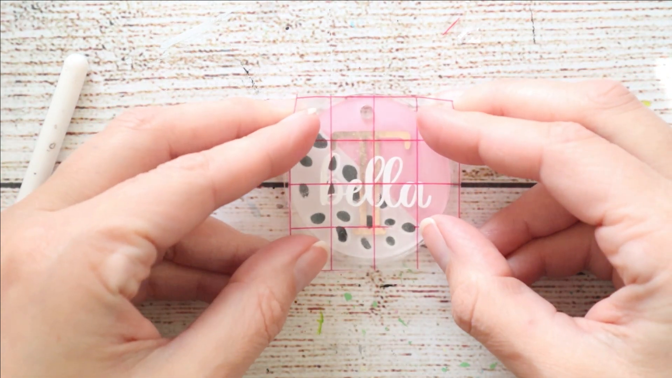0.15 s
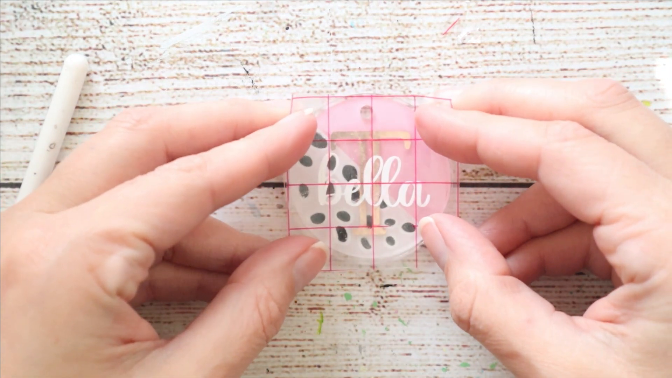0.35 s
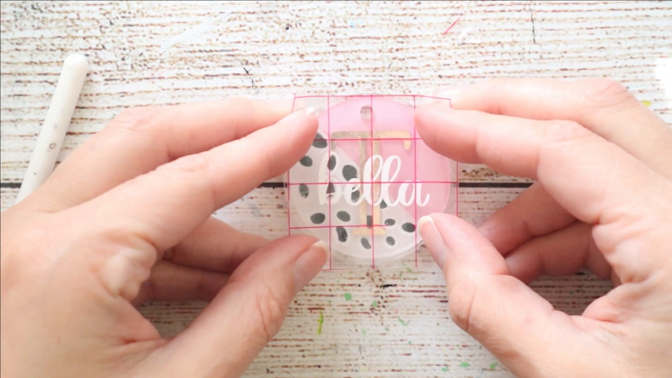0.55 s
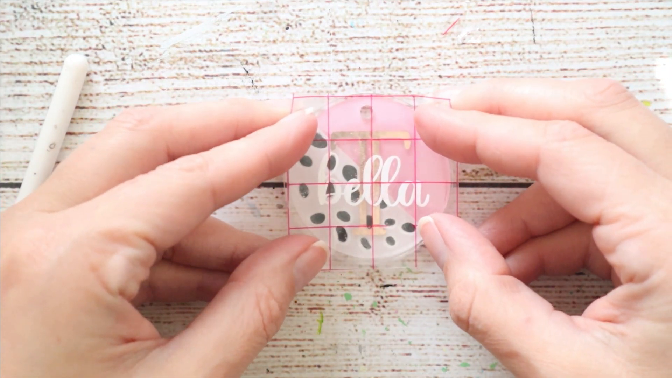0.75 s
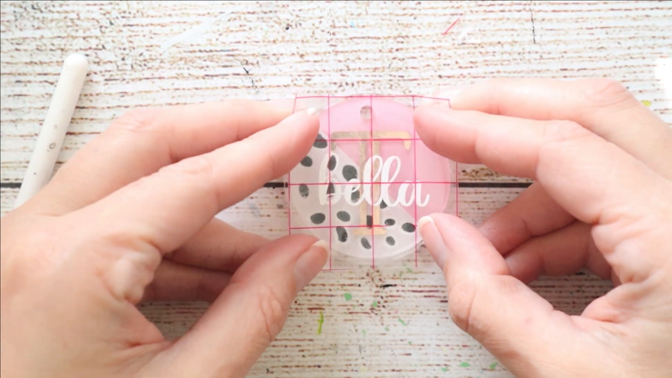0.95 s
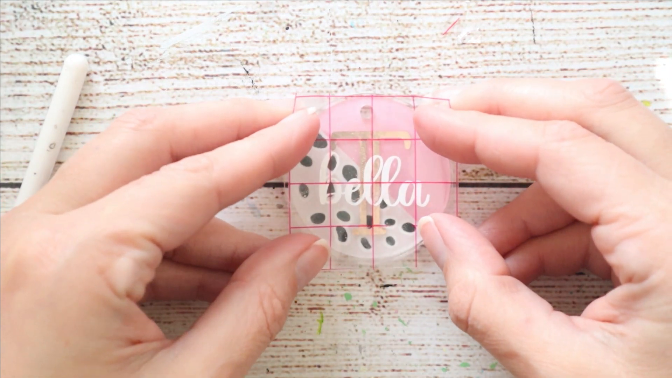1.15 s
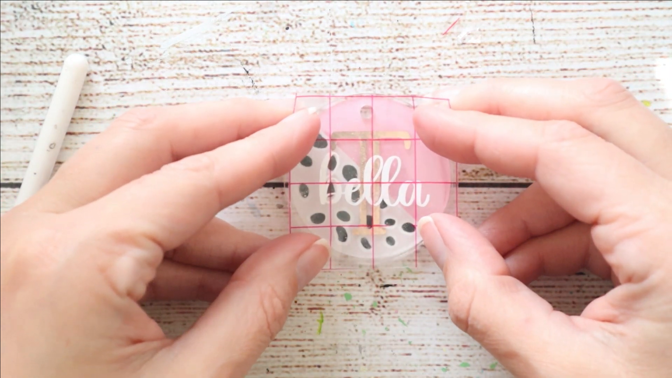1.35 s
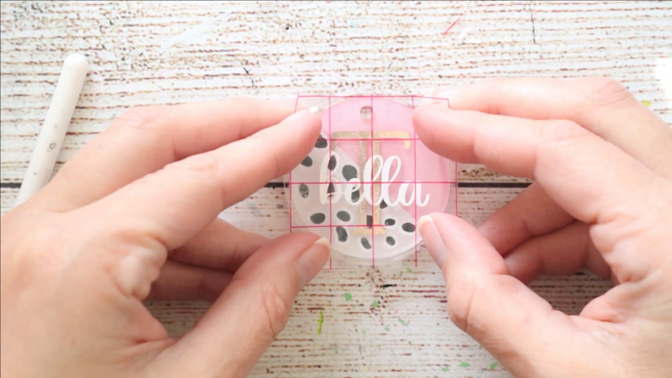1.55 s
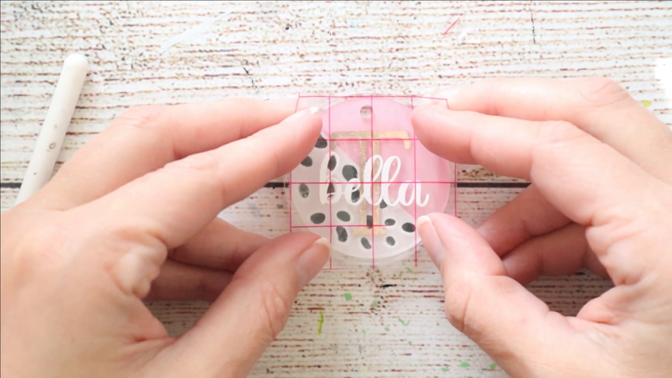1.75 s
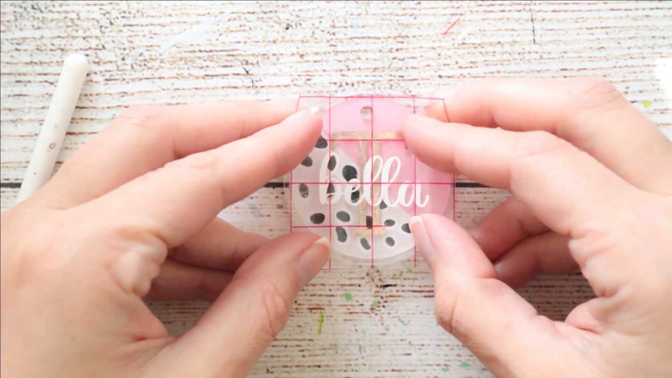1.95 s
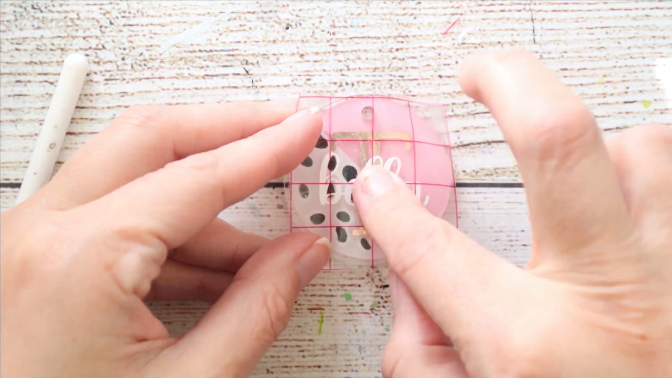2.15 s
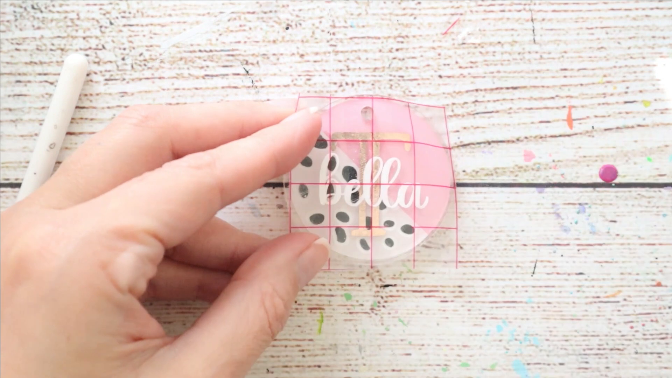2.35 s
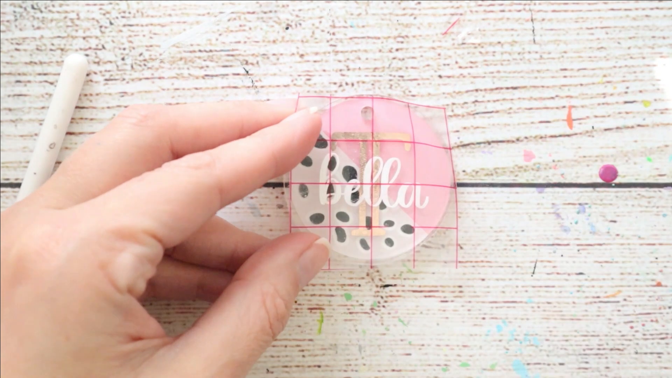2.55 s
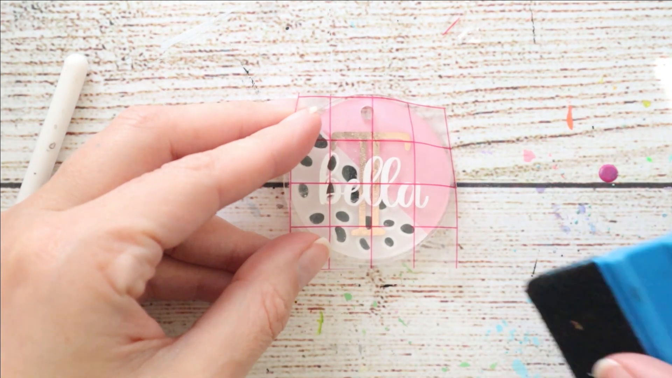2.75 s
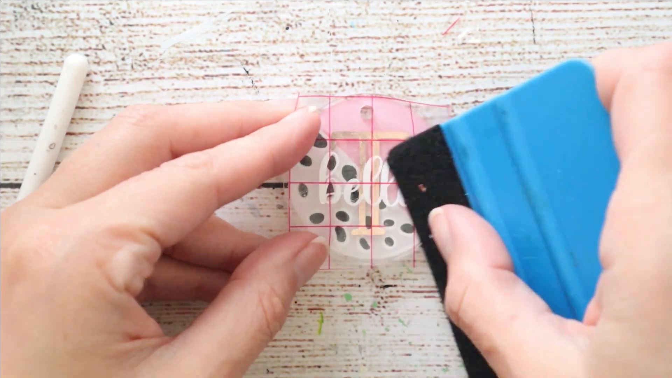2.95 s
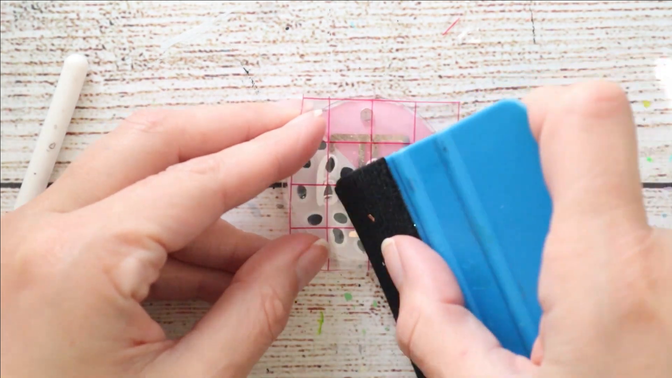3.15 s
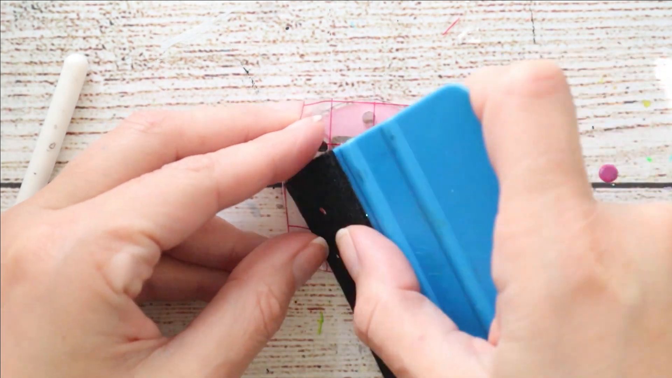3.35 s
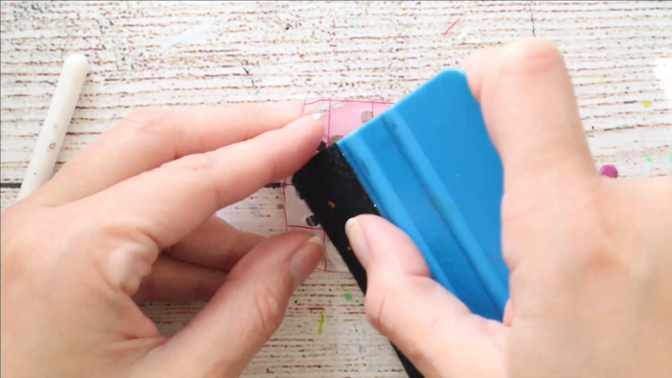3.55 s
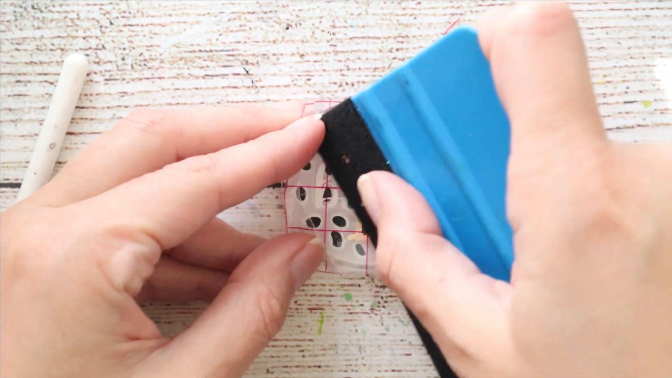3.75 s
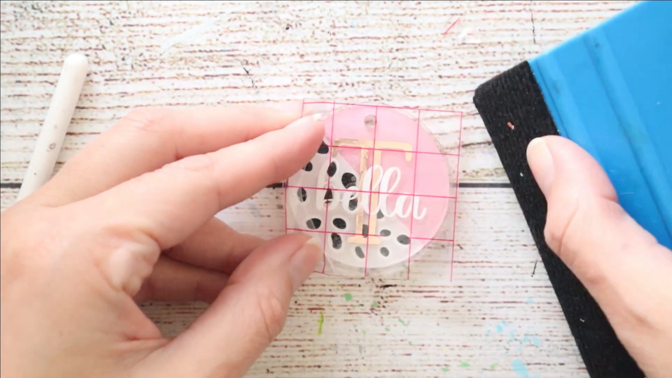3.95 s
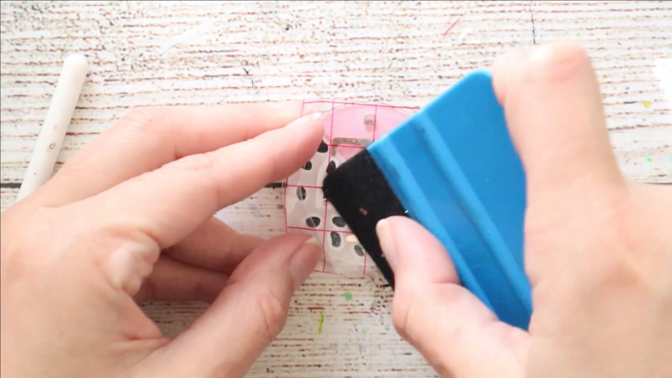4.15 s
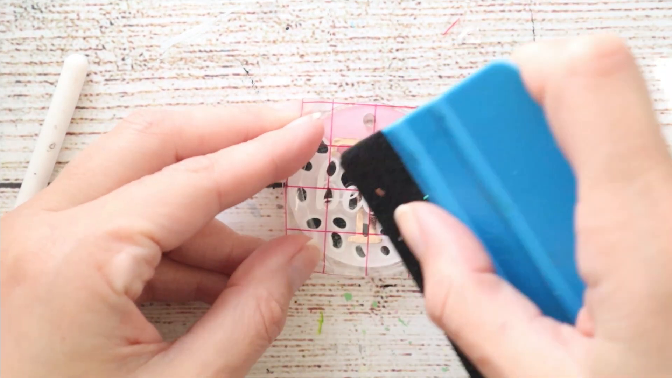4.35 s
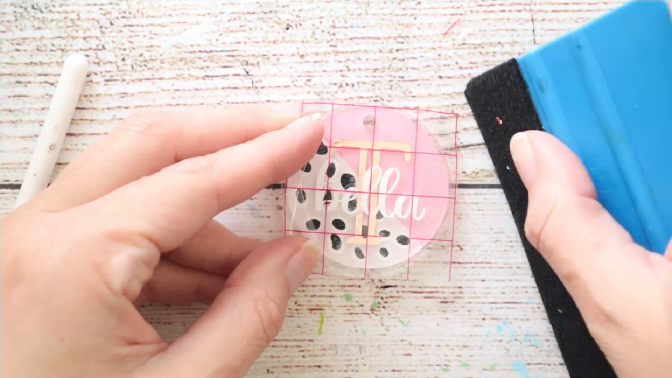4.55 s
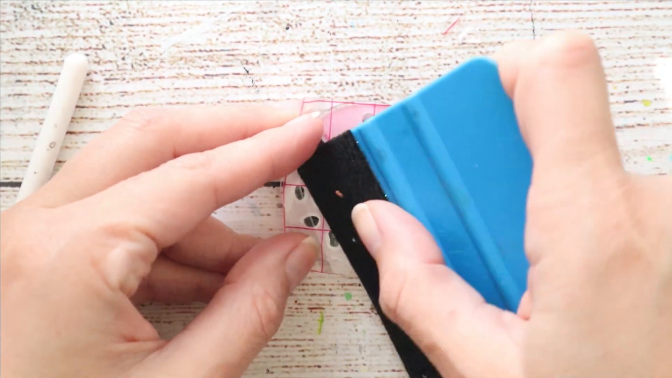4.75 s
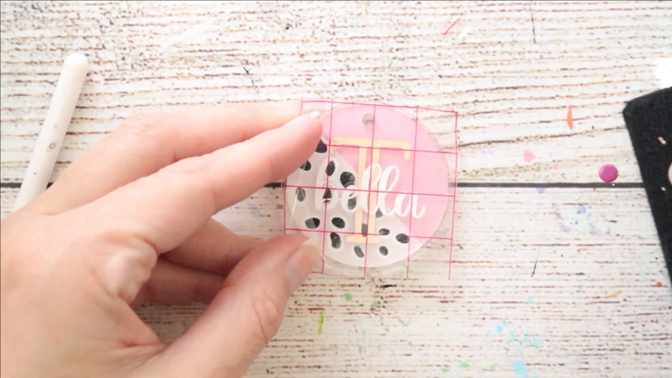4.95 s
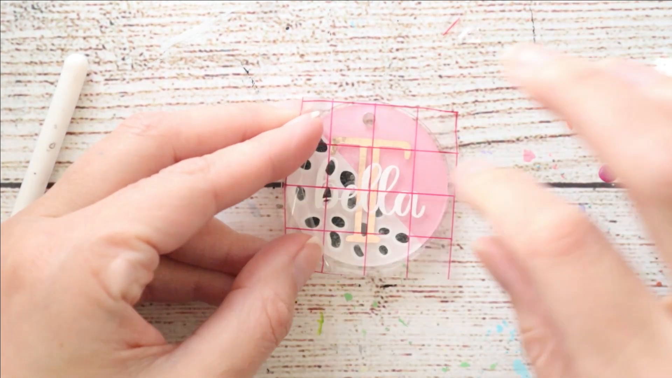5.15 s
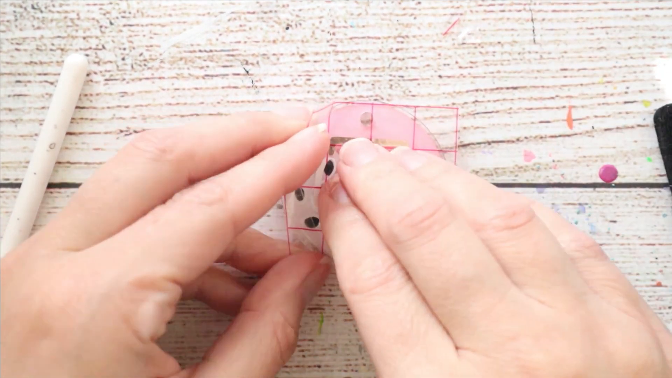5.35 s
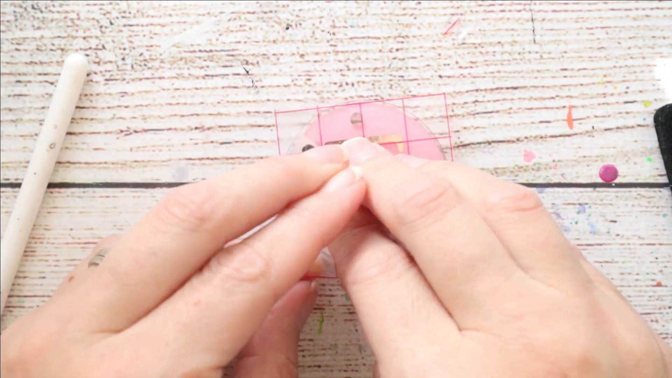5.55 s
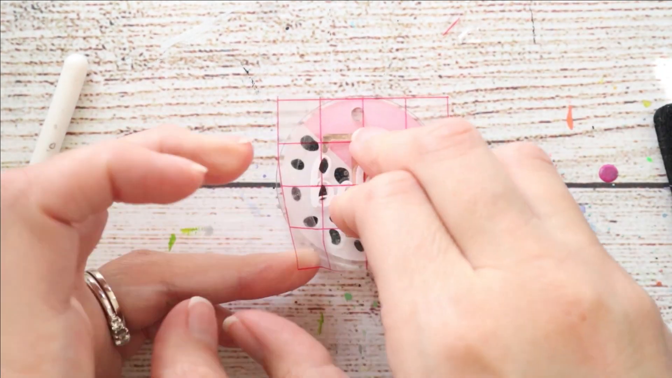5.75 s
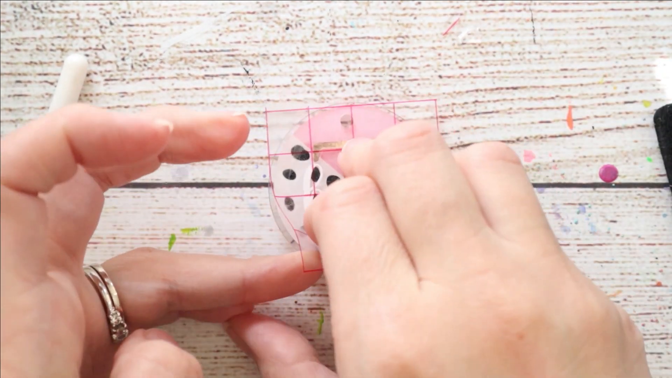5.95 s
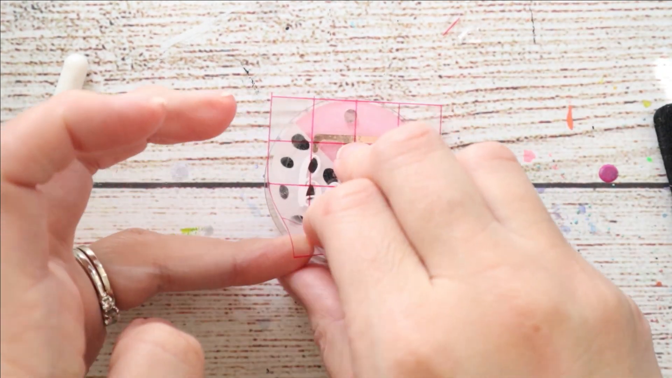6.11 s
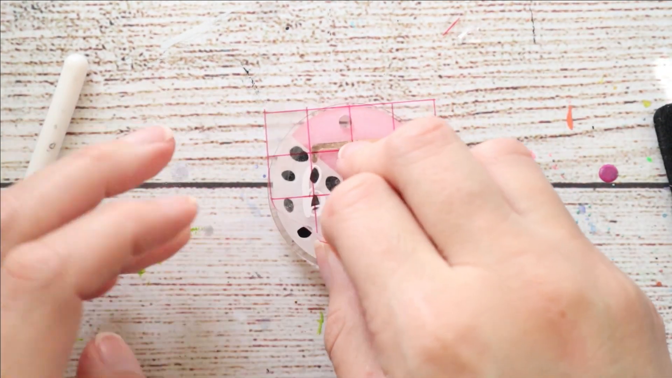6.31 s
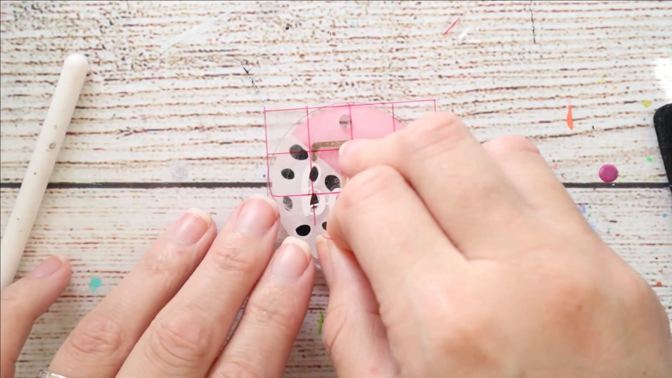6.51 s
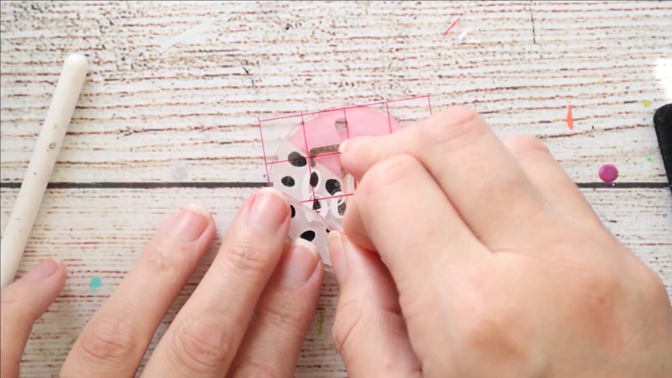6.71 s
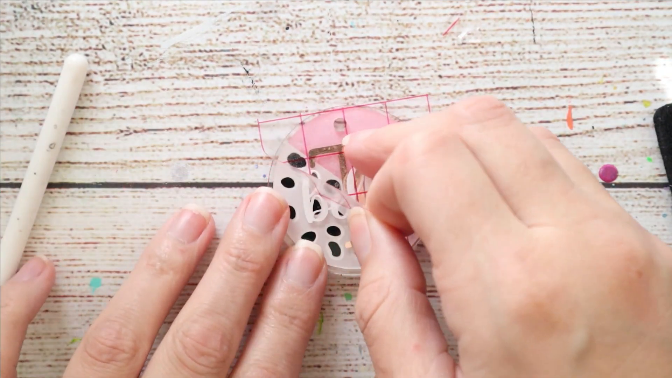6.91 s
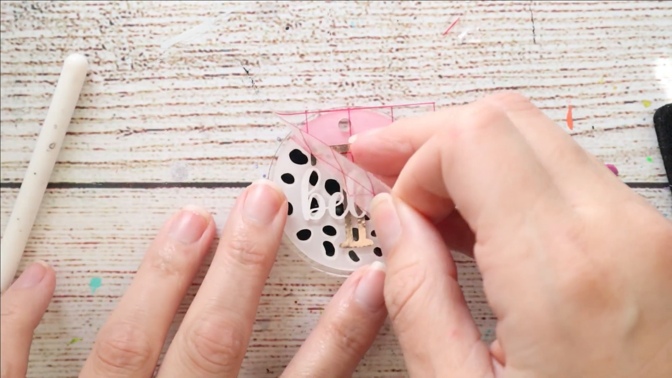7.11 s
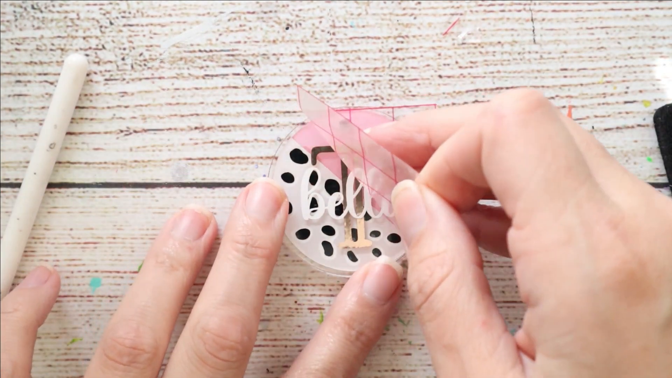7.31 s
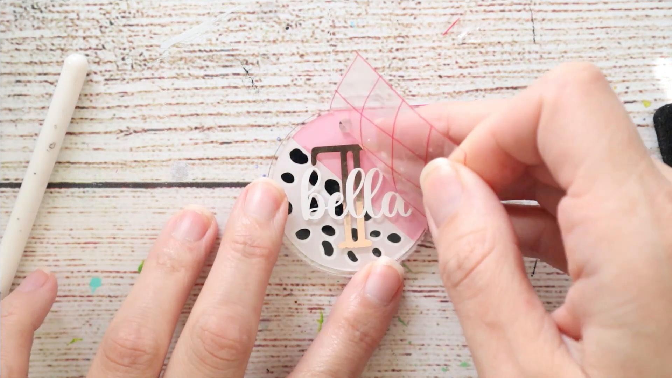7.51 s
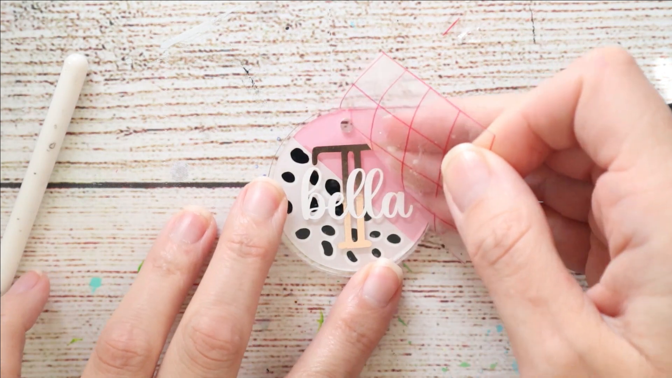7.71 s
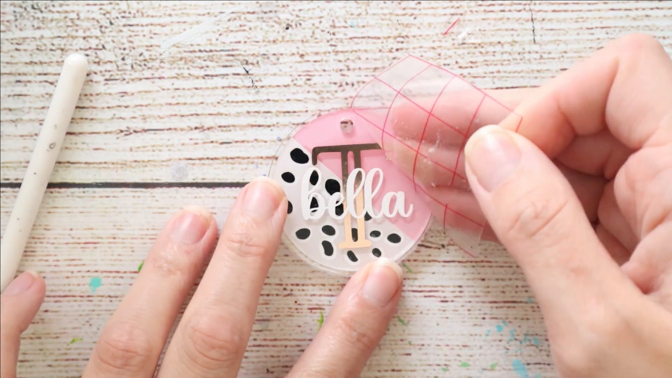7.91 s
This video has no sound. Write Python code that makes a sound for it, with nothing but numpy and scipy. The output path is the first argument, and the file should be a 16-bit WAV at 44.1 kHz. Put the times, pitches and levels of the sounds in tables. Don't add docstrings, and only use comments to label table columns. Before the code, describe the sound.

Close tabletop craft sounds: sharp film snaps, gritty rubbing, hard plastic clacks and wooden thumps, then quiet handling and soft adhesive fizz.

```python
import sys
import numpy as np
from scipy import signal
from scipy.fft import rfft, irfft, next_fast_len
from scipy.io import wavfile
from scipy.ndimage import uniform_filter1d

SR = 44100
rng = np.random.default_rng(int(sys.argv[2]) if len(sys.argv) > 2 else 0)


def how_loud(loudness_db):
    steps = np.asarray(loudness_db, float) / 20
    return 10 ** steps


def log_audio(samples):
    frames = np.atleast_2d(samples).T
    limited = np.clip(frames, -1, 1)
    pcm = np.round(limited * 32767).astype(np.int16)
    wavfile.write(sys.argv[1], SR, pcm)


N = 351473

# pitch_hz, level_db, t60_s (time to fade by 60 dB)
TABLE = [(62.45, -5.5, 0.17), (114, -5, 0.1), (140, -1.5, 0.12), (249, 3.5, 0.071), (313, 6.5, 0.041)]
# pitch_hz, level_db, t60_s
PLASTIC = [(591, -9, 0.073), (696, -0.5, 0.017), (1046, -1, 0.011), (1140, -14.5, 0.0099),
           (1900, 11, 0.007), (1885, -7, 0.024), (2600, 2, 0.0088), (3100, -38, 0.035)]
# time_s, level_db
PULL = [(6.45, -71.5), (6.68, -69), (6.73, -59), (6.95, -57.5), (7.28, -60), (7.36, -58), (7.58, -55.5),
        (7.72, -63.5), (7.97, -61.5)]


def evened(x):
    return x / np.sqrt(np.mean(x ** 2) + 1e-20)


def peaked(x):
    return x / (abs(x).max() + 1e-12)


def read(points, hz):
    f, value = np.transpose(points)
    return np.interp(np.log(hz + 1), np.log(f + 1), value)


def colour(x, points):
    size = next_fast_len(x.shape[-1])
    gain = how_loud(read(points, np.fft.rfftfreq(size, 1 / SR)))
    return irfft(rfft(x, size) * gain, size)[..., :x.shape[-1]]


def band(x, lo_hz, hi_hz, order=3):
    sos = signal.butter(order, [lo_hz, min(hi_hz, 20000)], "bandpass", fs=SR, output="sos")
    return signal.sosfilt(sos, x)


def add(mix, s, sound):
    part = mix[..., round(s * SR):][..., :sound.shape[-1]]
    part += sound[..., :part.shape[-1]]


def listed(kinds):
    return sorted((*row, *traits) for rows, *traits in kinds for row in rows)


def ring(modes, t, spread_db, chance):
    total = 0
    for (hz, db, t60), (a, b) in zip(modes, chance):
        fade = how_loud(db + spread_db * a - 60 * t / t60)
        total = total + fade * np.sin(2 * np.pi * hz * (1 + 0.055 * b) * t)
    return total


def grains(size_db, per_s):
    size = how_loud(size_db * np.minimum(rng.exponential(1, N), 5))
    slips = size * (rng.random(N) < per_s / SR)
    return evened(slips * rng.standard_normal(N)) + 1.14 * rng.standard_normal(N)


def flutter(depth_db, smooth_s):
    width = round(smooth_s * SR)
    slow = uniform_filter1d(uniform_filter1d(rng.standard_normal(N), width), width)
    return evened(how_loud(depth_db * evened(slow)))


def patchy(x, depth_db):
    z = signal.stft(x, nperseg=256)[2]
    field = uniform_filter1d(rng.standard_normal(z.shape), size=5, axis=0)
    field = uniform_filter1d(field, size=40, axis=1)
    return evened(signal.istft(z * how_loud(depth_db * evened(field)), nperseg=256)[1][:N])


def hum():
    # pitch_hz, level_db
    hum_colour = [(13, -46), (22, -19), (48, -4.5), (75, -3), (273, -5), (329, -8.5), (419, -9.5),
                  (756, -14), (819, -13.5), (2270, -21.5), (3210, -25.5), (12300, -42), (13000, -44),
                  (13600, -73)]
    # pitch_hz, side_minus_mid_db
    hum_side = [(60, -39), (110, -3.5), (200, -3), (360, 3), (650, 4.5), (1180, 5), (2150, 5), (3900, 7),
                (7070, 6), (12800, 5.5)]
    mid, side = colour(rng.standard_normal((2, N)), hum_colour)
    level = how_loud(-53.5) / np.std(mid) * flutter(0.1, 0.055)
    side = colour(side, hum_side)
    return level * np.array([mid + side, mid - side])


def held(curve, mix_db, t):
    s, db = np.transpose(curve)
    level = np.interp(t, s, db, left=-120, right=-120)
    return how_loud(2 * (level + np.array(mix_db)[:, None]))


def pressure():
    # time_s, level_db
    fingers = [
        [(1.95, -81), (2.058, -61), (2.22, -52.5)],
        [(2.64, -53), (2.794, -56), (3.044, -77), (3.252, -55), (3.796, -55.5), (4.19, -72)],
        [(5.39, -72), (5.45, -58), (5.562, -90), (5.798, -63.5), (6.1, -77.5)],
    ]
    # hiss_db, scrape_db, drag_db
    finger_mix = [0, 1.1, 5.8]
    # hiss_db, scrape_db, drag_db
    pull_mix = [-4.5, -8, 0]
    # start_s, hold_s, effort_db, film_share_db
    strokes = [(2.57, 0.045, -44, -4), (3.02, 0.058, -56, -4), (3.17, 0.046, -60.5, 9),
               (3.38, 0.07, -49.5, 0), (3.86, 0.162, -59, 3), (4.24, 0.1, -41, -7),
               (4.53, 0.13, -44.5, -7.5), (4.85, 0.089, -43.5, -6)]
    # start_s, hold_s, effort_db, film_share_db
    skids = [(2.25, 0.042, -49.5, -0.5), (2.375, 0.013, -49, -2.5), (2.78, 0.0066, -53.5, -26),
             (4.35, 0.0065, -47, -16), (4.65, 0.0056, -48, -22), (4.97, 0.0045, -40.5, -1.5),
             (5.23, 0.042, -40.5, -17), (5.365, 0.0069, -47, -13), (5.46, 0.069, -66.5, 13.5),
             (6.115, 0.0084, -48, -1), (6.33, 0.082, -58.5, 8)]
    # start_s, hold_s, effort_db, film_share_db
    drags = [(2.55, 0.0033, -46, -5.5), (2.66, .03, -50, -39), (3.15, 0.076, -42, -11.5),
             (3.6, 0.08, -47.5, -27), (4.03, 0.014, -41.5, -24), (5.3, 0.055, -32, -37),
             (6.03, 0.041, -49.5, -16), (6.13, 0.054, -44, -33.5), (7.12, 0.041, -52, -34),
             (7.92, 0.039, -44.5, -26)]
    # rows, rise_db_per_s, fall_db_per_s, scrape_db, drag_db, hiss_lag_s
    motions = [(strokes, 3400, 160, 0, -1.8, 0.019),
               (skids, 1100, 121, 0, 6.6, 0.0027),
               (drags, 127, 240, -38, 0, 0.00304)]
    t = np.arange(0, N / SR + .01, .001)
    power = held(PULL, pull_mix, t) + sum(held(c, finger_mix, t) for c in fingers)
    for rows, rise, fall, scrape_db, drag_db, lag in motions:
        for s, hold, db, film_db in rows:
            start = s + np.array([[lag], [0], [0]])
            shape = db - rise * np.maximum(start - t, 0) - fall * np.maximum(t - s - hold, 0)
            power = power + how_loud(2 * (shape + np.array([[film_db], [scrape_db], [drag_db]])))
    return (np.interp(np.arange(N) / SR, t, 10 * np.log10(p)) for p in power)


def rubbing():
    # pitch_hz, level_db
    hiss_colour = [(1500, -11), (2500, 1), (3300, 1), (4300, 1.5), (5600, -0.5), (6700, -2), (7800, -4.5),
                   (9200, -5.5), (11000, 0), (13300, -11.5), (15500, -35.5), (17000, -57)]
    # pitch_hz, level_db
    scrape_colour = [(300, -27.5), (520, 5), (750, 0), (1100, -1.5), (1600, 2.5), (2100, -1), (2800, -12),
                     (3400, -11), (5000, -32), (9000, -55.5)]
    patch_db = 2.1
    hiss_db, scrape_db, drag_db = pressure()
    hiss = patchy(colour(grains(3., 3000), hiss_colour), patch_db) * flutter(1.2, .008)
    scrape = patchy(colour(grains(0.87, 2500), scrape_colour), patch_db) * flutter(0.36, 0.0052)
    t = np.arange(8000) / SR
    bumps, still = grains(4.6, 300), np.zeros((4, 2))
    low = evened(signal.oaconvolve(bumps, ring(TABLE[:3], t, 0, still))[:N])
    high = evened(signal.oaconvolve(bumps, ring(TABLE[3:] + PLASTIC[:2], t, 0, still))[:N])
    drag = high + low * how_loud(-6.0 - 0.79 * np.maximum(drag_db + 46.0, 0))
    drag = evened(drag) * flutter(2.6, .02)
    return how_loud(hiss_db) * hiss + how_loud(scrape_db) * scrape + how_loud(drag_db) * drag


def snap(db, bright_db, body_db, t60, body_hz, chance):
    t = np.arange(chance.shape[1]) / SR
    fade = how_loud(-60 * t / np.clip(t60, .004, .08)) + 4.8 * np.exp(-t / 0.00069)
    rise = 0.00025 + 0.19 * max(t60 - .026, 0)
    cracks = chance[0] * how_loud(5.64 * chance[1]) * fade * np.minimum(t / rise, 1)
    sound = peaked(band(cracks, 3300, 8680)) + how_loud(bright_db) * peaked(band(cracks, 7340, 13000))
    body = band(cracks, body_hz / 1.35, body_hz * 1.347, order=2)
    return how_loud(db) * (sound + how_loud(body_db) * peaked(body))


def film_snaps(work):
    # time_s, peak_db, brightness_db, flap_boom_db
    laying = [(2.002, -40, 1, -4), (2.062, -35.5, 0.5, -27), (2.1202, -20, 5, -13.5),
              (2.155, -31.5, 3, -22), (2.163, -26, 5.5, -25), (2.1765, -20, -1, -14), (2.18, -15, 0.5, -11),
              (2.185, -18, 1, -17), (2.2149, -19.5, 0, -17), (2.378, -33.5, -12, -1),
              (2.4394, -46, -6.5, 13), (2.5017, -32.5, -8, -12), (2.517, -35.5, -12, -4),
              (2.574, -30.5, 1, -14), (2.5958, -22.5, -26, -18), (2.952, -48.5, -10, 15),
              (2.9665, -48, -7.5, 7)]
    smoothing = [(3.1812, -19.5, -9.5, -5), (3.2725, -25.5, -8.5, -7), (3.3714, -23.5, -5, -2.5),
                 (3.3848, -25.5, -2.5, -21), (3.4274, -35.5, 2.5, 1), (3.4468, -30, -4, -6),
                 (3.6605, -36.5, -4, 5), (3.739, -30, -5.5, -6.5), (3.8373, -31, -10, -5),
                 (3.8622, -33, -2, 6.5), (3.8674, -21, -17, -41), (3.9988, -33, -3.5, 2.5),
                 (4.0284, -21, -22, -8.5), (4.041, -35.5, 9.5, -22)]
    burnishing = [(4.2176, -15.5, -10.5, -9), (4.3297, -17, 6.5, -2.5), (4.5106, 0.5, 4, -5.5),
                  (4.6325, -21, 2, 8), (4.8278, -8.5, -1.5, -7.5), (4.8325, -13, 5, -13.5),
                  (4.9474, -13, 1.5, -3), (5.2789, -37, -12, 4), (5.3615, -23.5, -29, -14),
                  (5.3692, -21, -12, -9)]
    blade = [(5.2075, -7, -28, 6), (5.2112, -20.5, -21, -22), (5.226, -19, 3, -21),
             (5.2665, -38.5, -13.5, 17.5), (5.3228, -46, -12.5, 17.5), (5.738, -55, -10, 11)]
    peeling = [(5.4487, -20.5, 3, -12.5), (5.5545, -32, -4, -4), (5.5608, -39, -6, 2),
               (5.5997, -28.5, -0.5, -36), (6.8069, -29.5, 4.5, -13), (6.8485, -51, -3, 10)]
    rustles = [(2.6044, -31.5, -1, 1), (2.7585, -44.5, 5, 10.5), (2.785, -32, -3, 6),
               (3.037, -37.5, -3.5, -16), (5.509, -21, -15.5, -5.5), (6.112, -34, -3, -8),
               (6.25, -39.5, -11.5, -6.5), (7.514, -32.5, -6, -12)]
    cracks = [(2.233, -3.5, 1.5, -21), (3.1052, -23.5, -2, 2), (3.2833, -18.5, 4.5, -16),
              (3.421, -23, -4, 2), (3.9381, -22, 8, -23), (6.3129, -26, 14, -25)]
    last_spots = [(7.7164, -54, -13, 6), (7.7368, -51, -11.5, 4), (7.7947, -44, -15, 3),
                  (7.8382, -49, -10, 4), (7.8768, -44.5, -6, 5.5), (7.9043, -48.5, -16, 7)]
    corner = [(7.918, -55, -11, 13), (7.9317, -59, -11, 16)]
    # snaps, t60_s, pitch_hz
    stages = [(laying, 0.026, 1660), (smoothing, 0.025, 2400), (burnishing, 0.028, 1710),
              (blade, 0.0071, 2500), (peeling, 0.028, 1900), (rustles, 0.05, 2400),
              (cracks, 0.026, 3560), (last_spots, .026, 5600), (corner, 0.035, 4100)]
    snaps = listed(stages)
    for (s, *row), chance in zip(snaps, rng.standard_normal((len(snaps), 2, 2000))):
        add(work, s, snap(*row, chance))


def blow(db, clack_db, hz, t60, top_hz, focus_db, skid_db, chance):
    t = np.arange(chance.shape[1]) / SR
    near = [(f, d - focus_db * abs(np.log2(f / hz)), r * t60 / 0.077) for f, d, r in TABLE]
    table = ring([(hz, 0., t60)] + near, t, 4.3, chance[1, :12].reshape(-1, 2))
    plastic = ring(PLASTIC, t[:2000], 1.95, chance[1, 20:36].reshape(-1, 2))
    push = np.exp(-t[:400] / 0.00064) * (0.14 + abs(chance[0, :400]))
    thud = signal.fftconvolve(table, push)[:len(t)]
    fade = np.exp(-t / 0.0071) + how_loud(skid_db - 60 * t / 0.16)
    rattle = chance[0] * how_loud(3.3 * chance[2]) * fade
    clack = peaked(signal.fftconvolve(rattle, plastic)[:len(t)])
    clack = clack + 0.15 * peaked(band(rattle, 520, 1600))
    clack = band(clack, 397, 1.43 * top_hz, order=2)
    return how_loud(db) * (peaked(thud) + how_loud(clack_db) * peaked(clack))


def table_blows(work):
    # time_s, peak_db, plastic_clack_db, table_pitch_hz
    hard = [(2.376, -44, 11, 260), (2.5012, -25.5, -2, 330), (3.179, -30.5, -6, 130),
            (3.42, -32.5, -20, 144), (3.535, -32.5, -28, 255), (3.836, -25, -29, 117),
            (3.868, -27.5, -16.5, 89), (5.737, -24.5, -6, 304)]
    slaps = [(2.2335, -22.5, -3.5, 303), (4.509, -10, -7, 287.4), (5.2075, -12, -1.5, 310)]
    landings = [(4.218, -10, 1, 306), (4.827, -12, -2, 292)]
    felt = [(2.518, -13.5, -10, 338), (2.594, -26.5, -1.5, 319), (3.003, -15, -15.5, 249),
            (3.999, -31, 0, 104.4), (4.948, -13, -1.5, 217), (5.321, -27, 0, 323)]
    soft = [(2.1265, -25, -6.5, 310), (2.273, -32.5, -1.5, 294), (2.82, -35, -9, 110),
            (3.2791, -32.5, -9.5, 134), (3.623, -28.5, -11, 306), (3.732, -27.5, -34, 106),
            (4.029, -17.5, -14.5, 254), (4.3288, -12, -1.5, 121), (4.632, -12.5, -9, 237),
            (5.108, -30, -5.5, 329), (5.278, -15, -4.5, 298), (5.368, -22, -5.5, 301),
            (6.04, -30.5, -18.5, 62.2), (6.3128, -22.5, -14, 104)]
    heel = [(6.101, -38, -14, 274), (6.114, -22, -9, 271), (6.13, -51, -2, 320), (6.153, -48, -10, 340),
            (6.18, -32, -6, 292)]
    # blows, t60_s, top_hz, pitch_focus_db_per_octave, skid_db
    contacts = [(hard, 0.17, 1600, 3., -2.5), (slaps, 0.1, 800, 3.3, -25.5),
                (landings, 0.16, 1340, 3.9, -8), (felt, 0.099, 1110, 3.1, -25),
                (soft, 0.14, 710, 1.4, -9.5), (heel, 0.31, 340, 30, -15)]
    blows = listed(contacts)
    for (s, *row), chance in zip(blows, rng.standard_normal((len(blows), 3, 9000))):
        add(work, s, blow(*row, chance))


def strike(modes, damping_hz, contact_s):
    t = np.arange(6000) / SR
    rung = 0
    for hz, width_hz, db in modes:
        w = width_hz + damping_hz
        rung = rung + how_loud(db) * w * np.exp(-np.pi * w * t) * np.sin(2 * np.pi * hz * t)
    pushed = signal.lfilter([1], [1, -np.exp(-1 / (contact_s * SR))], rung)
    return peaked(band(pushed, 0.79 * modes[0][0], 16300, order=2))


def clean_strikes(work):
    # pitch_hz, width_hz, level_db
    landing_ring = [(316, 97, -2.5), (589, 24, -10.5), (886, 25, -18), (1363, 26, -8), (1710, 35, -10),
                    (1963, 81, -14.5), (2400, 28, -32), (2670, 76, -27)]
    slap_ring = [(306, 30, 0), (607, 27, 2.5), (736, 44, -4), (1056, 60, -4.5), (1410, 95, -6),
                 (1980, 100, 1), (2670, 250, -11.5)]
    return_ring = [(314, 20, 1), (760, 30, -10), (883, 26, -21.5), (1450, 30, -5), (1798, 69, -5),
                   (2050, 70, -4), (2296, 65, -19), (3360, 19, -19.5)]
    drop_ring = [(319, 11, 3), (547, 74.7, -18.5), (1000, 59, -8), (2060, 78, -3), (2650, 100, 2.5),
                 (2780, 86, -8.5), (3800, 130, -28.5)]
    felt_ring = [(237, 28, -7.5), (313, 80, -1.5), (576, 31, -12.5), (760, 38, -6.5), (1100, 92, -9.5),
                 (1325, 27, -13)]
    pick_ring = [(345, 22, 5.5), (1056, 88, -10.5), (1830, 150, -14.5), (2600, 140, -15)]
    wood_ring = [(254, 6.2, 1), (340, 35, 1.5), (586, 19, -2), (688, 20, -3), (1175, 33, -11.5),
                 (1630, 32, -21)]
    laid_ring = [(1714, 86, 1.5), (3630, 120, 10.5), (4400, 220, -3), (7400, 300, 0.5), (7700, 110, 1.5),
                 (10200, 130, -13), (10700, 320, -17), (13300, 300, -22.5), (14900, 200, -22.5)]
    lift_ring = [(3800, 89, -4), (4930, 110, 3), (6700, 230, -3.5), (8000, 290, -1), (10500, 270, 1.5),
                 (12200, 220, -15), (14300, 180, -32)]
    palm_ring = [(114, 67, -1.5), (246, 17, -0.5), (746, 41, -7.5), (965, 17, -16), (1050, 15, -19.5)]
    knuckle_ring = [(119, 27, -1), (242, 26, 0.5), (563, 14.6, -8), (990, 140, -17), (1111, 24, -15.5)]
    nail_ring = [(310, 31, 3), (700, 38, -7), (1100, 32, -23.5), (1450, 34, -14), (2710, 60, -24)]
    # (time_s, peak_db)
    strikes = [
        (laid_ring, 140, .00002, [(2.2330, -3.5), (2.2338, -36), (2.2365, -28)]),
        (pick_ring, 46, .0001, [(2.5145, -27), (2.5183, -12), (2.54, -26)]),
        (felt_ring, 36, 0.00019, [(3.0035, -17.5), (3.0108, -23.5), (3.0165, -20), (3.036, -27),
                                  (5.278, -17.5)]),
        (landing_ring, 33, .0001, [(4.2157, -28), (4.2181, -7.5), (4.2215, -8), (4.2245, -23),
                                   (4.2305, -15), (4.2372, -16)]),
        (palm_ring, 33, .0001, [(4.3288, -9), (4.339, -16.5), (4.632, -18), (4.641, -20)]),
        (knuckle_ring, 35, .0001, [(4.9478, -12), (4.957, -18)]),
        (nail_ring, 26, .0001, [(5.737, -25), (5.742, -29)]),
        (slap_ring, 49, .00005, [(4.5073, -34), (4.5097, 0), (4.5127, -7), (4.5155, -17)]),
        (return_ring, 29, .0001, [(4.8247, -22), (4.8272, -8), (4.8300, -18)]),
        (drop_ring, 50, .00005, [(5.2073, -6), (5.2085, 2.5), (5.2110, -16.5)]),
        (wood_ring, 18, 0.00017, [(6.102, -30), (6.113, -34), (6.119, -21), (6.128, -37), (6.133, -18.5),
                                  (6.146, -23), (6.156, -37), (6.164, -25), (6.173, -40), (6.187, -36),
                                  (6.203, -31.5)]),
        (laid_ring, 790, .00003, [(3.1053, -22), (3.1815, -23), (3.3716, -23), (3.4212, -14.5),
                                  (3.6608, -25.5), (3.7392, -31), (3.8676, -18.5), (4.3292, -18)]),
        (lift_ring, 1860, .00002, [(3.2803, -15), (3.2828, -11.5), (4.2183, -22), (4.5096, 0),
                                   (5.4497, -19.5), (6.8069, -41)]),
        (lift_ring, 290, .00002, [(6.3130, 0), (6.3138, -12), (6.3149, -7), (6.3172, -14.5)]),
    ]
    for *body, hits in strikes:
        for s, db in hits:
            add(work, s, how_loud(db) * strike(*body))


def squeak(length, from_hz, to_hz, db, width, slips):
    u = np.arange(0, length, 1 / SR) / length
    turn = np.exp(2j * np.pi * np.cumsum(from_hz + (to_hz - from_hz) * u) / SR)
    r = np.exp(-np.pi * width * from_hz / SR)
    rung = (turn * signal.lfilter([1], [1, -2 * r, r * r], slips[:len(u)] / turn)).real
    return how_loud(db) * evened(rung) * np.sqrt(abs(np.sin(np.pi * u)))


def gliding_slips(work):
    # start_s, length_s, from_hz, to_hz, level_db
    rasps = [(2.52, 0.05, 900, 800, -41), (3.008, 0.081, 1180, 1000, -49),
             (4.235, 0.096, 1280, 1650, -36.5), (4.24, 0.077, 2500, 2600, -49.5),
             (4.835, 0.051, 1810, 1450, -33.5), (4.88, 0.033, 1600, 2100, -39.5),
             (4.52, 0.06, 1506, 1302, -36.5), (5.215, 0.058, 2730, 2600, -41.5),
             (5.29, 0.073, 2600, 2790, -49), (6.84, 0.13, 2400, 1900, -61), (6.92, 0.061, 4400, 4020, -61),
             (7.55, 0.11, 3600, 3400, -58.5), (3.62, 0.062, 3720, 3600, -56),
             (4.335, 0.022, 3800, 3620, -50), (4.9, 0.022, 2300, 2680, -43),
             (5.262, .014, 1200, 1100, -37.5), (6.17, 0.19, 4600, 4650, -62), (7.5, .1, 10460, 10500, -57)]
    # start_s, length_s, from_hz, to_hz, level_db
    squeaks = [(6.11, 0.042, 3640, 3630, -51.5), (6.325, 0.085, 4930, 4570, -51.5),
               (6.83, 0.27, 5740, 5830, -65), (6.85, 0.11, 8000, 7760, -71),
               (7.31, 0.095, 7700, 7400, -56.5), (7.5, 0.2, 7400, 7700, -55),
               (7.31, 0.14, 5400, 5800, -58.5), (7.48, 0.17, 5970, 5230, -57),
               (7.512, 0.029, 2300, 2400, -55.5), (7.93, 0.056, 3900, 4100, -57)]
    slips = grains(4., 1700)
    for k, (s, *row) in enumerate(listed([(rasps, .5), (squeaks, .2)])):
        add(work, s, squeak(*row, slips[k * SR // 4:]))


def peel():
    # pitch_hz, level_db
    peel_colour = [(1470, -37), (2500, 7.5), (2860, -15.5), (4300, -11.5), (5470, -1.5), (6420, -4),
                   (7540, -3), (8860, -4.5), (11700, 0), (13300, -5), (14500, -10)]
    fizz = band(colour(grains(3.2, 3000), peel_colour), 3600, 15000)
    fizz = patchy(fizz, depth_db=3.3) * flutter(1.8, .012)
    s, db = np.transpose(PULL)
    return how_loud(3 + np.interp(np.arange(N) / SR, s, db, left=-120)) * fizz


def tail(seconds, decays, start):
    shape = (2, round(seconds * SR))
    taps = rng.choice([-1., 1.], shape) * (rng.random(shape) < .06)
    taps[:, :start] = 0
    hz, t, z = signal.stft(taps, SR, nperseg=256)
    out = signal.istft(z * how_loud(-60 * t / read(decays, hz)[:, None]), SR, nperseg=256)[1]
    return out / np.linalg.norm(out, axis=1, keepdims=True)


def capsules(x):
    # pitch_hz, t60_s
    room_decay = [(100, 1), (260, 0.5), (700, 0.54), (1840, 0.39), (4850, 0.12), (12000, 0.27)]
    # pitch_hz, side_minus_mid_db
    near_side = [(60, -35.5), (180, -35), (360, -18.5), (700, -9.5), (1400, -3.5), (2800, -1), (6000, 1),
                 (12800, 2)]
    echoes = signal.fftconvolve(x[None], tail(0.68, room_decay, start=300), axes=1)[:, :N]
    room = how_loud(-18.5) * echoes
    turned = -signal.hilbert(x, next_fast_len(N))[:N].imag
    side = colour(turned + how_loud(8.0) * room[1], near_side)
    return x + room[0] + np.array([side, -side])


def scene():
    work = rubbing()
    film_snaps(work)
    table_blows(work)
    clean_strikes(work)
    work = work + peel()
    gliding_slips(work)
    work = band(work, 50, 12000)
    return capsules(-work) + hum()


def top_cut(x):
    return signal.sosfilt(signal.butter(12, 16600, fs=SR, output="sos"), x)


def record(dry):
    clipped = np.clip(dry, -1, 1)
    return top_cut(clipped)


dry = scene()
out = record(dry)
log_audio(out)
```